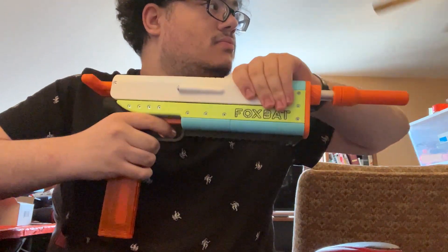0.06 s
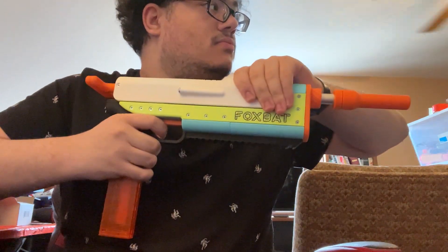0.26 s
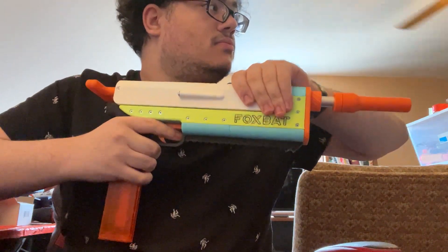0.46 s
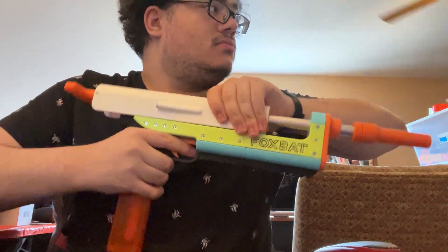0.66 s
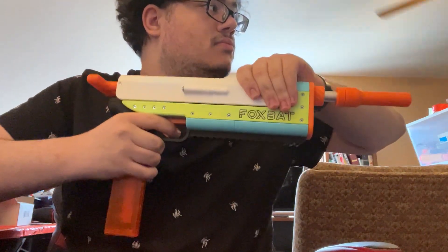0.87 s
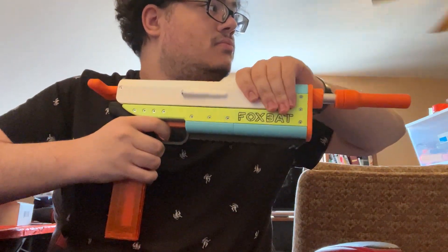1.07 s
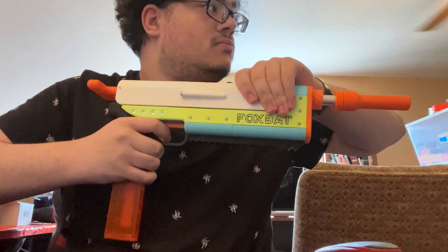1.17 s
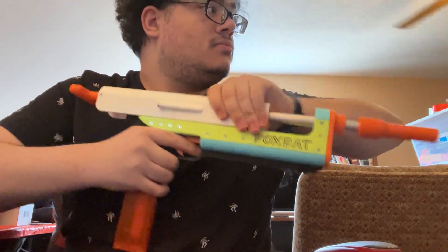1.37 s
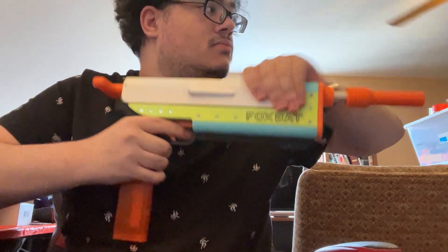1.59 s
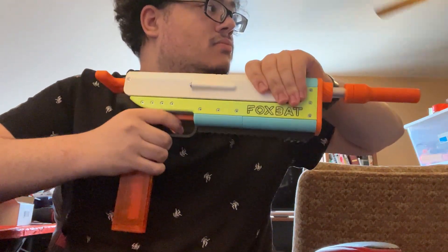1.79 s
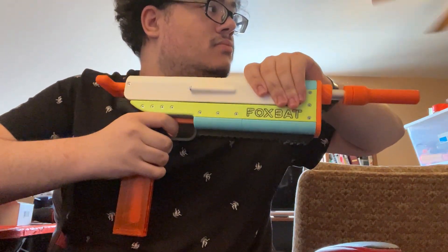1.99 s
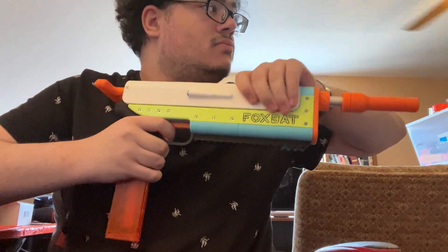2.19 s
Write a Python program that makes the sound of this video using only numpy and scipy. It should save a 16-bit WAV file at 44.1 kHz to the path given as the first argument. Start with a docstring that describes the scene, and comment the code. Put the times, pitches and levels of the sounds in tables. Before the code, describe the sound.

Close phone pickup in a small live room: toy blaster shot, squeaky grainy pull back, latch clack, forward knock, then the same cycle again and a final shot, with soft thuds and faint hum.

```python
"""Foam dart blaster, three shots

A spring-powered foam dart blaster, a metre from a phone in a living room, is fired three times and primed by hand
between shots. Shot: trigger tick, plunger noise burst, slam of ringing body modes, low puff, dart smear across the
room. Prime: gliding squeaks and grainy scrape back, latch, squeaks forward, knock shut. A dart impact already dies
away at the start; soft thuds, a faint spring tone, steady air noise, appliance hum and a noise-tail room complete it.
"""
import sys
import numpy as np
from scipy import signal
from scipy.fft import rfft, irfft
from scipy.io import wavfile
from scipy.ndimage import uniform_filter1d

SR = 44100
rng = np.random.default_rng(int(sys.argv[2]) if len(sys.argv) > 2 else 0)


def wav_record(signal):
    """Record a signal, one row per channel, as 16-bit PCM in the file named by sys.argv[1]."""
    frames = np.transpose(np.atleast_2d(signal))
    bounded = np.clip(frames, -1, 1)
    # unit amplitude maps onto the largest positive 16-bit level
    quanta = np.round(bounded * 32767).astype(np.int16)
    wavfile.write(sys.argv[1], SR, quanta)


def amplitude_ratio(level_db):
    """Convert a level in decibels to the matching linear amplitude (field) ratio."""
    exponent = np.asarray(level_db, float) / 20
    return 10 ** exponent


N = 99225
T = np.arange(N) / SR

# plunger let go, rattling down its tube: t/s, level/dB, length/s
RUSHES = [(0.2041, -9, 0.0071), (1.043, -18, 0.0088), (1.8502, -18.5, .009)]


def on_log(points, hz):
    """Read (f/Hz, value) points on a log-frequency axis."""
    p = np.array(points)
    return np.interp(np.log(np.maximum(hz, 1)), np.log(p[:, 0]), p[:, 1])


def colour(x, points):
    """Filter by (f/Hz, gain/dB) points, scaled so white noise keeps its level."""
    gain = amplitude_ratio(on_log(points, np.fft.rfftfreq(len(x), 1 / SR)))
    return irfft(rfft(x) * gain / np.sqrt(np.mean(gain ** 2)), len(x))


def curve(tables, cols=(1,)):
    """Gain from the summed dB columns of (t/s, dB, ..) tables, silent between them."""
    total = np.zeros(N)
    for table in tables:
        points = np.array(table)
        level_db = np.interp(T, points[:, 0], points[:, list(cols)].sum(axis=1))
        edge_s = np.minimum(T - points[0, 0], points[-1, 0] - T)
        total += amplitude_ratio(level_db) * np.clip(edge_s / 0.00067, 0, 1)
    return total


def fall(t, t60):
    """Silent before 0, then exponential decay, 60 dB down in t60."""
    return (t >= 0) * np.exp(-np.log(1000) * np.maximum(t, 0) / t60)


def grit(unevenness):
    """Noise of uneven grains, rms 1: its dB gain follows smoothed exponential noise."""
    grains = uniform_filter1d(rng.exponential(size=N), size=12)
    x = rng.standard_normal(N) * amplitude_ratio(unevenness * grains * 1.15)
    return x / np.std(x)


def pair(mid, side):
    """Left and right diffuse sound from two noises, as alike as each pitch range is."""
    # diffuse sound: f/Hz, likeness of the ports
    alike = [(60, 0.94), (250, 0.37), (700, 0.13), (3000, 0.13), (6000, 0.17), (9000, 1), (16000, 0.39)]
    c = np.clip(on_log(alike, np.fft.rfftfreq(N, 1 / SR)), 0, 1)
    mid, side = rfft(mid) * np.sqrt(1 + c), rfft(side) * np.sqrt(1 - c)
    return irfft(np.array([mid + side, mid - side]), N) / np.sqrt(2)


def darts():
    """Dart impact across the room: a tick over a held, then decaying smear from nearby surfaces."""
    # landings, the first just before the start: t/s, level/dB
    landings = [(-.03, -26.5), (.266, -29.5), (1.1064, -19), (1.914, -20)]
    # impact spectrum: f/Hz, gain/dB
    spectrum = [(150, -11.5), (600, -1), (1300, -2), (2100, -1), (3200, -2.5), (6500, -9), (10700, -2),
                (16500, -17.5)]
    hold_s, smear_t60_s = 0.0086, 0.15
    tick_db, tick_t60_s = -5, 0.029
    shape = np.zeros(N)
    for s, db in landings:
        smear = (T >= s) * np.where(T < s + hold_s, 1, fall(T - s - hold_s, smear_t60_s))
        tick = amplitude_ratio(tick_db) * fall(T - s, tick_t60_s)
        shape += amplitude_ratio(db) * (smear + tick)
    return shape * pair(colour(grit(4.5), spectrum), colour(grit(4.3), spectrum))


def air():
    """Steady diffuse noise of the room air, partly alike in the two ports."""
    # air spectrum: f/Hz, gain/dB
    spectrum = [(15, -21.5), (25, 25.5), (127, -18.5), (439, -18), (1100, -13.5), (1740, -26), (5880, -26),
                (8360, -38), (10700, -29.5), (16000, -47)]
    level_db = -54
    noise = pair(*rng.standard_normal((2, N)))
    return amplitude_ratio(level_db) * np.array([colour(c, spectrum) for c in noise])


def hum():
    """Appliance drone: steady sines."""
    # drone tones: f/Hz, level/dB
    tones = [(67, -64.5), (120, -67.5)]
    return sum(amplitude_ratio(db) * np.sin(2 * np.pi * hz * T) for hz, db in tones)


def room(x):
    """Reverberation: convolution with a noise tail whose decay depends on pitch."""
    # decay: f/Hz, t60/s
    decay = [(100, 0.34), (1000, 0.36), (5000, 0.36), (15000, 0.3)]
    # tail spectrum: f/Hz, gain/dB
    spectrum = [(60, -4.5), (250, 6.5), (1000, 5.5), (4000, 7), (15000, 3)]
    level_db, gap_s = -15.5, 0.0049
    f, t, z = signal.stft(pair(*rng.standard_normal((2, N))), SR, nperseg=256)
    z = z * fall(t, on_log(decay, f)[:, None]) * amplitude_ratio(on_log(spectrum, f))[:, None]
    tail = signal.istft(z, SR, nperseg=256)[1][:, :SR]
    tail = tail * np.clip(T[:SR] / gap_s - 0.5, 0, 1)  # fades in from 0.5 to 1.5 gaps
    tail = tail / np.sqrt(np.sum(tail ** 2) / 2)
    return amplitude_ratio(level_db) * signal.fftconvolve(x, tail, axes=1)[:, :N]


def knocks():
    """Each blow rings the body modes nearest its spot, a little differently each time, with a short crack."""
    # plastic body modes: f/Hz, level/dB before spot weighting, t60/s
    modes = np.array([(95, -7, 0.028), (248.2, -25, 0.12), (367, -10, .035), (496, -17.5, 0.045),
                      (700, -19, 0.037), (958, -3.5, 0.025), (1275, -10, 0.015), (1490, -13.5, .018),
                      (2100, -14.5, 0.025), (2615, -27.5, .012), (3250, -9, 0.06), (4300, -13, .015),
                      (5800, -10, .015), (6500, -15, .015)])
    # blows: t/s, level/dB, favoured pitch of the spot/Hz, crack against ring/dB
    blows = [(.177, -38.5, 780, -31), (0.2165, -7.5, 1080, -4.5), (.221, -7, 308, -5),
             (0.423, -30, 4500, -6), (0.55, -48, 1230, -6), (.5775, -12, 1273, 2), (0.58, -12, 410, -20.5),
             (0.633, -26.5, 5140, 6.5), (0.8126, -18, 1500, 12), (.816, -9.5, 700, -18),
             (1.018, -45, 805, -21), (1.059, -2.5, 869, -3.5), (1.0627, -5.5, 300, -11.5),
             (1.267, -39, 4500, 4), (1.376, -21.5, 520, -9.5), (1.405, -14, 980, -1.5),
             (1.407, -14, 403, -3.5), (1.46, -28, 5500, 10.5), (1.6225, -7.5, 1026, -2.5),
             (1.626, -16.5, 500, 2), (1.864, -4.5, 1000, -1), (1.868, -7, 305, -4.5)]
    # crack spectrum: f/Hz, gain/dB
    crack_spectrum = [(150, -24), (600, -16.5), (1500, 3), (4000, -6), (7000, -1.5), (11000, -0.5),
                      (16500, -13)]
    detune, spread_db, spot_db_per_octave = 0.03, 2.0, 7
    crack_t60_s, crack_rise_s = 0.015, 0.00036
    size = 8192
    out, t = np.zeros(N + size), np.arange(size) / SR
    for s, db, spot_hz, crack_db in blows:
        a, b = rng.standard_normal((2, len(modes), 1))
        hz = modes[:, :1] * (1 + detune * a)
        mode_db = modes[:, 1:2] + spread_db * b - spot_db_per_octave * np.abs(np.log2(hz / spot_hz))
        ring = np.sum(amplitude_ratio(mode_db) * np.sin(2 * np.pi * hz * t) * fall(t, modes[:, 2:]), axis=0)
        crack = colour(rng.standard_normal(size), crack_spectrum)
        crack = crack * fall(t, crack_t60_s) * np.minimum(t / crack_rise_s, 1)
        i = int(s * SR)
        out[i:i + size] += amplitude_ratio(db) * (ring + amplitude_ratio(crack_db) * crack)
    return out[:N]


def rushes():
    """Plunger rush: gritty burst that swells fast and stops at the slam."""
    # rush spectrum: f/Hz, gain/dB
    spectrum = [(150, -20), (500, -4), (1300, -1), (2500, -13.5), (5500, -11.5), (10500, -6.5),
                (16500, -24.5)]
    rise_s, stop_t60_s = 0.006, 0.01
    shape = np.zeros(N)
    for s, db, length_s in RUSHES:
        end = s + length_s
        swell = np.clip((T - s) / rise_s, 0, 1)
        shape += amplitude_ratio(db) * swell * np.where(T < end, 1, fall(T - end, stop_t60_s))
    return shape * colour(grit(3.9), spectrum)


def puffs():
    """Air leaving the barrel: low decaying sines after each shot."""
    # puff tones: f/Hz, level/dB, t60/s
    tones = [(57.4, -32.5, 0.3), (95, -23.5, 0.064)]
    delay_s = 0.01
    out = np.zeros(N)
    for s, _, _ in RUSHES:
        t = T - s - delay_s
        for hz, db, t60 in tones:
            out += amplitude_ratio(db) * fall(t, t60) * np.sin(2 * np.pi * hz * t)
    return out


def thuds():
    """Round low bumps: decaying sines that swell for a few ms."""
    # likely the dart or a hand bumping something padded: t/s, level/dB, f/Hz
    bumps = [(.275, -25.5, 210), (.425, -57, 251.3), (1.12, -26, 186), (1.739, -44.5, 230),
             (1.79, -50, 253), (2.052, -36.5, 231), (2.071, -32, 195.6), (2.094, -36, 209),
             (2.121, -47, 205.4), (2.234, -54.5, 190)]
    rise_t60_s, t60_s = 0.0029 * 7, 0.054
    out = np.zeros(N)
    for s, db, hz in bumps:
        t = T - s
        out += amplitude_ratio(db) * (1 - fall(t, rise_t60_s)) * fall(t, t60_s) * np.sin(2 * np.pi * hz * t)
    return out


def spring():
    """Faint ring of a spring: a thin tone whose level wavers."""
    # ring, one table per stretch: t/s, rms level/dB
    stretches = [
        [(.28, -58), (.36, -53), (.43, -49.5), (.52, -61)],
        [(2.07, -53.5), (2.1, -55.5), (2.15, -67.5), (2.2, -56), (2.25, -71.5)],
    ]
    tone_hz, waver_db = 1175, 1.2
    waver = uniform_filter1d(uniform_filter1d(rng.standard_normal(N), size=500), size=500)
    level = curve(stretches) * amplitude_ratio(waver_db * waver / np.std(waver))
    return np.sqrt(2) * level * np.sin(2 * np.pi * tone_hz * T)


def slide():
    """Rough gliding stick-slip tones over grainy scraping and a duller rub of the rails."""
    # scraping, one table per stroke: t/s, treble level/dB, mid against treble/dB
    strokes = [
        [(0.505, -49, 1), (0.517, -25.5, -20), (0.533, -30.5, -9.5), (0.553, -26, -8), (0.561, -29.5, -3),
         (0.575, -24.5, -5), (0.621, -47, 3), (0.635, -25.5, -15), (0.65, -52, 11)],
        [(0.72, -63.5, 6.5), (0.774, -42, 6), (0.788, -53, -4), (0.81, -18, -22)],
        [(1.33, -61, 12), (1.342, -24.5, -19), (1.362, -39, 0.5), (1.406, -21.5, -7.5), (1.422, -38, 0),
         (1.436, -40, -13.5), (1.452, -47.5, 15.5), (1.462, -24, -9), (1.475, -41, -5)],
        [(1.54, -60.5, 7), (1.592, -46.5, 7.5), (1.606, -37, -30), (1.62, -14.5, -8)],
    ]
    # scrape spectrum: f/Hz, gain/dB
    scrape_spectrum = [(1500, -12), (2500, -8), (3900, -11), (6500, -7), (10600, -4), (16500, -17.5)]
    # rub spectrum: f/Hz, gain/dB
    rub_spectrum = [(150, -42), (300, -27.5), (450, -4), (750, -10.5), (1250, 0.5), (2000, -11),
                    (3500, -24)]
    # squeaks: t/s, length/s, start f/Hz, end f/Hz, level/dB
    squeaks = [(.511, 0.0068, 3200, 3250, -23.5), (.512, 0.0017, 1570, 1670, -20),
               (0.518, 0.01, 2310, 3050, -22.5), (.516, 0.002, 4100, 4500, -21.5),
               (0.623, 0.0099, 852, 1070, -22), (0.621, 0.0049, 1530, 1580, -25),
               (0.735, 0.0071, 1038, 1120, -33.5), (0.741, 0.0096, 2950, 3100, -34),
               (0.744, 0.0068, 1307, 1660, -30), (0.766, 0.019, 2530, 3080, -31),
               (.798, 0.0062, 3160, 3250, -19.5), (0.808, 0.0017, 3230, 3630, -10),
               (1.337, 0.0079, 3160, 3250, -28.5), (1.338, 0.0065, 1390, 1790, -27),
               (1.341, 0.011, 2080, 2910, -22.5), (1.342, 0.0048, 4300, 4580, -25.5),
               (1.452, 0.014, 850, 1080, -24.5), (1.554, 0.0062, 1016, 1240, -36),
               (1.557, 0.0074, 2820, 3600, -39.5), (1.56, 0.019, 1864, 2020, -41),
               (1.577, 0.0081, 2100, 2850, -34), (1.584, 0.011, 2870, 3270, -35),
               (1.596, 0.013, 3520, 3575, -26.5), (1.609, 0.013, 3774, 3530, -22.5),
               (1.619, 0.0025, 4190, 3790, -19)]
    scrape_db, rub_db = 1, -0.5
    rough_db, octave_db, jitter = 0.35 * 6, -22, 0.025
    scrape = amplitude_ratio(scrape_db) * curve(strokes) * colour(grit(7), scrape_spectrum)
    rub = amplitude_ratio(rub_db) * curve(strokes, cols=(1, 2)) * colour(grit(2.5), rub_spectrum)
    out = scrape + rub
    slow = uniform_filter1d(rng.standard_normal((2, N)), size=40, axis=1)
    flutter, wobble = slow / np.std(slow, axis=1, keepdims=True)
    for s, length_s, hz0, hz1, db in squeaks:
        u = np.clip((T - s) / length_s, 0, 1)
        hz = (u > 0) * (hz0 + (hz1 - hz0) * u) * (1 + jitter * wobble)
        phase = 2 * np.pi * np.cumsum(hz) / SR
        tone = np.sin(phase) + amplitude_ratio(octave_db) * np.sin(2 * phase)
        out += amplitude_ratio(db) * np.sin(np.pi * u) ** 0.43 * amplitude_ratio(rough_db * flutter) * tone
    return out


def left_port(x):
    """Phase shift of the left port, varying with pitch."""
    # f/Hz, left port lead/rad
    lead = [(0, 1), (780, -0.5), (1030, -6.5), (1640, -4.5), (2840, -8), (5940, -4), (6890, -4.5),
            (8870, -1.5), (10400, 0), (11500, 1.5), (13900, 1.5), (16500, 10.5)]
    radians = np.interp(np.fft.rfftfreq(2 * N, 1 / SR), *np.array(lead).T)
    return irfft(rfft(x, 2 * N) * np.exp(1j * radians))[:N]


def scene():
    """Sum direct sources, room reply, air, puffs and hum; shift the left port and set the balance."""
    body_low_hz, shot_s, pan_db = 140, 0.03, -0.44
    shot_wet_db, slide_wet_db, dart_wet_db = 7, -2, 9  # room sends
    high = signal.butter(2, body_low_hz, "high", fs=SR)
    far = darts()
    gun = signal.lfilter(*high, knocks() + rushes() + thuds())
    hand = spring() + slide()
    shot = sum((T >= s) * (T < s + shot_s) for s, _, _ in RUSHES)
    sent = gun * amplitude_ratio(shot_wet_db * shot) + amplitude_ratio(slide_wet_db) * hand + amplitude_ratio(dart_wet_db) * far
    left, right = gun + hand + far + room(sent) + air() + puffs() + hum()
    return np.array([left_port(left) * amplitude_ratio(pan_db / 2), right * amplitude_ratio(-pan_db / 2)])


def band_limit(x):
    """A steep low-pass at the top of the band."""
    return signal.sosfilt(signal.butter(12, 16990, fs=SR, output="sos"), x)


def record(dry):
    """Microphone colour, then a soft tanh ceiling."""
    # microphone response: f/Hz, gain/dB
    response = [(20, -46.5), (60, -6.5), (150, 0), (7400, 3.5), (8450, -10.5), (9600, -7), (12300, -5),
                (13400, -11.5), (14500, 1.5), (16000, -5.5), (17000, -38.5)]
    heard = np.array([colour(c, response) for c in dry])
    mix = np.tanh(heard * 0.88) / 0.73
    return band_limit(mix)


dry = scene()
out = record(dry)
wav_record(out)
```